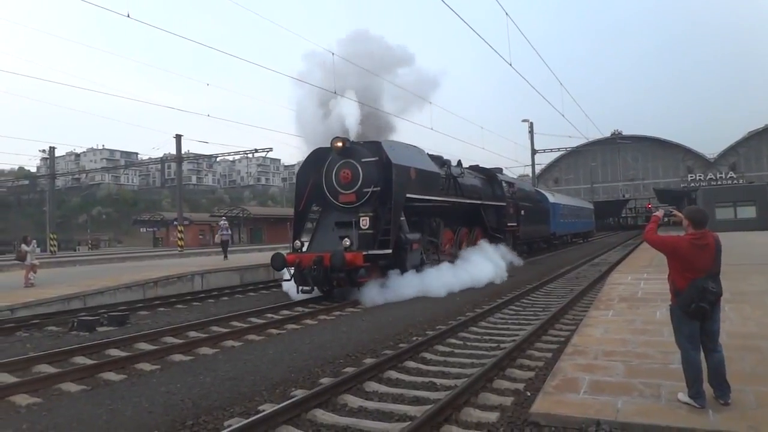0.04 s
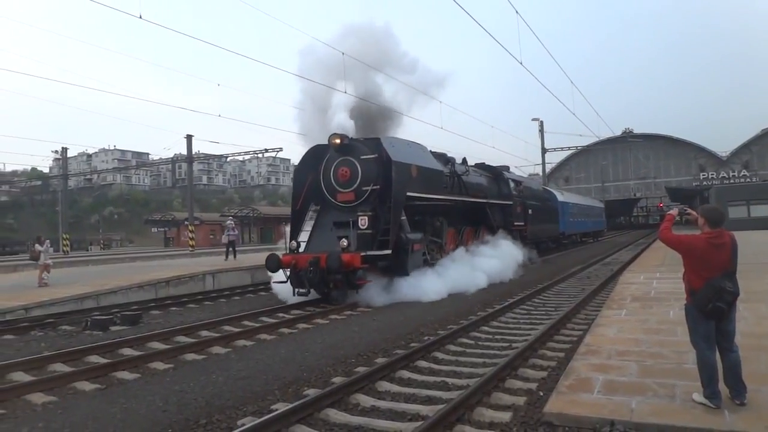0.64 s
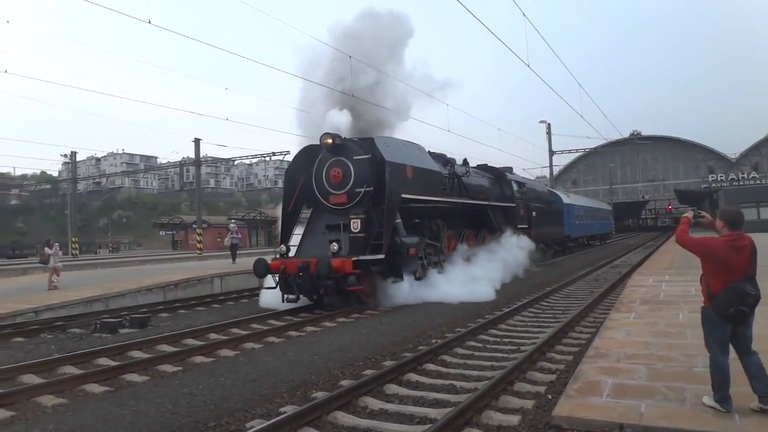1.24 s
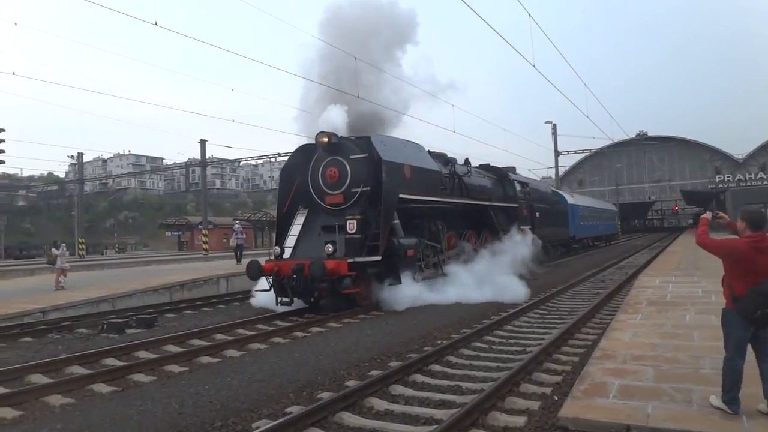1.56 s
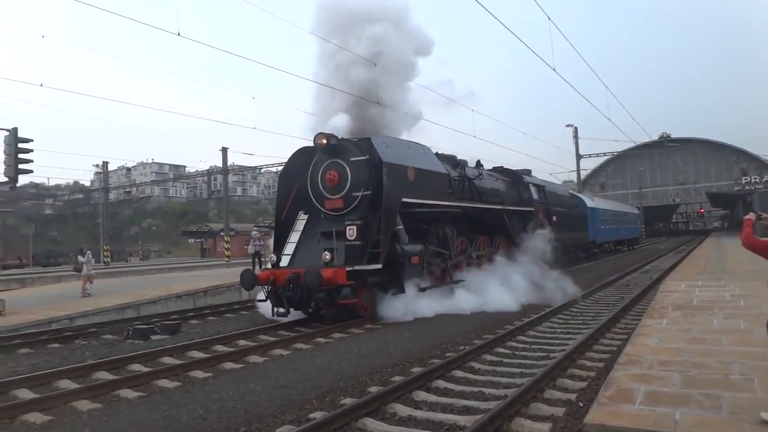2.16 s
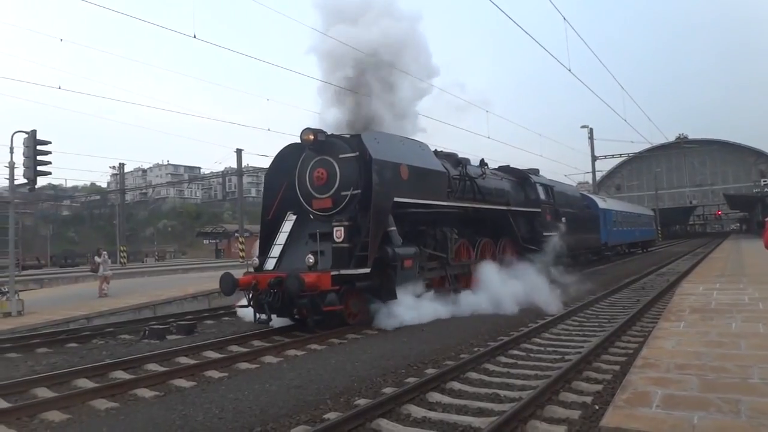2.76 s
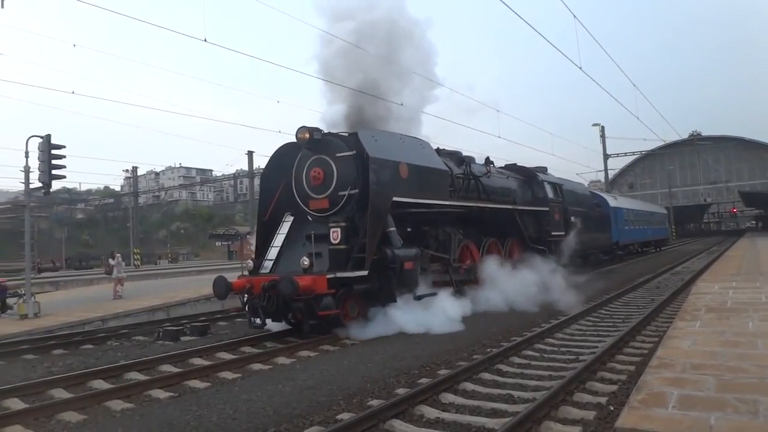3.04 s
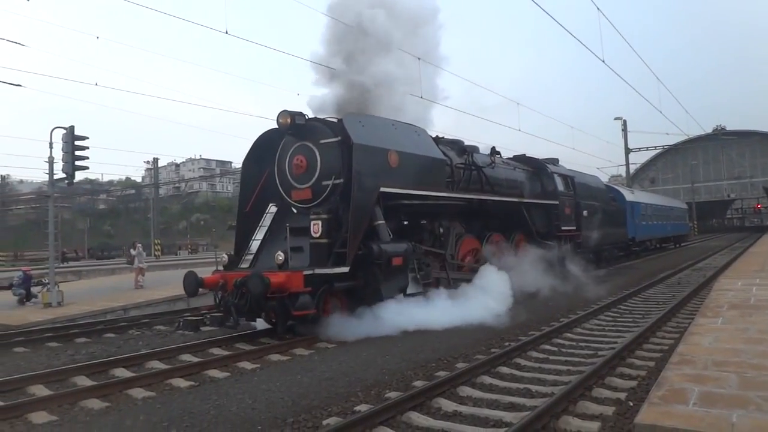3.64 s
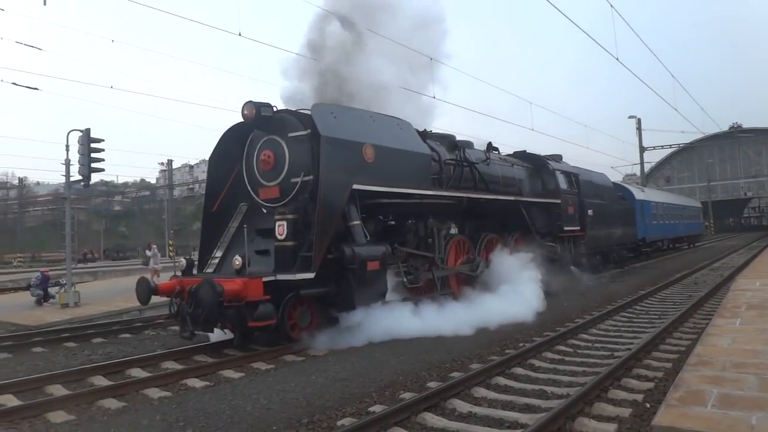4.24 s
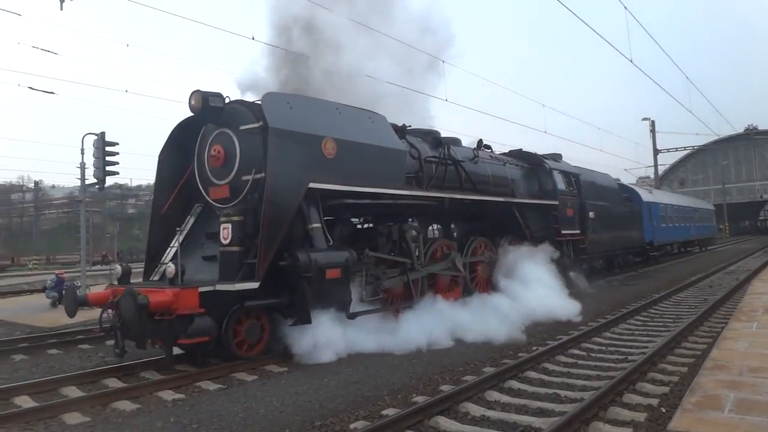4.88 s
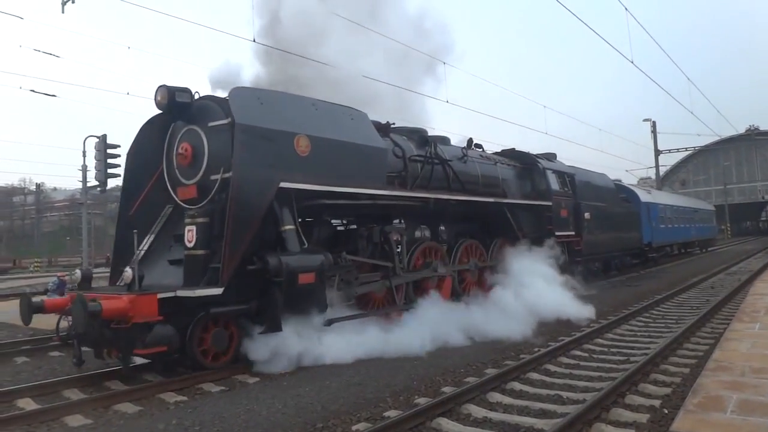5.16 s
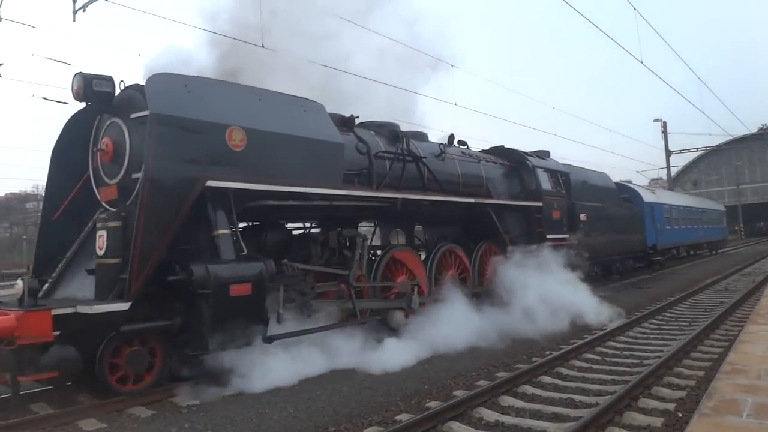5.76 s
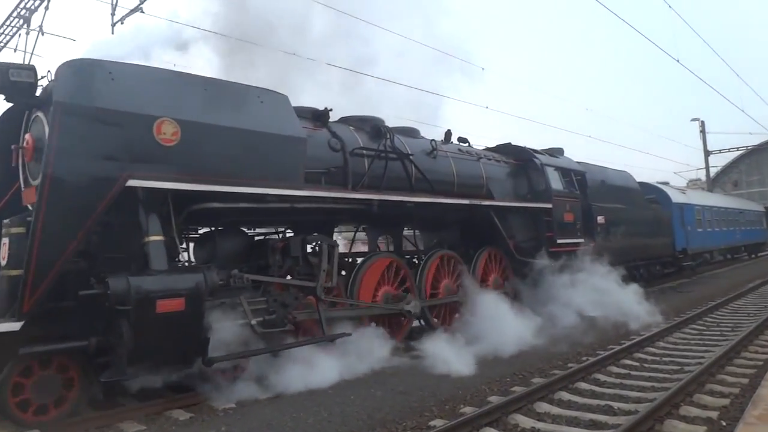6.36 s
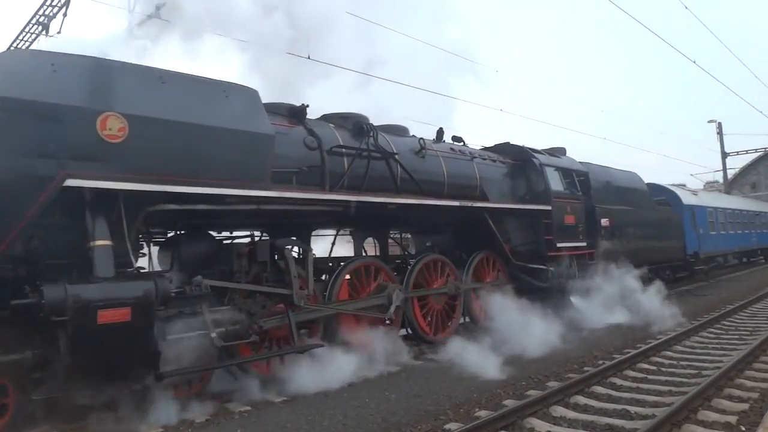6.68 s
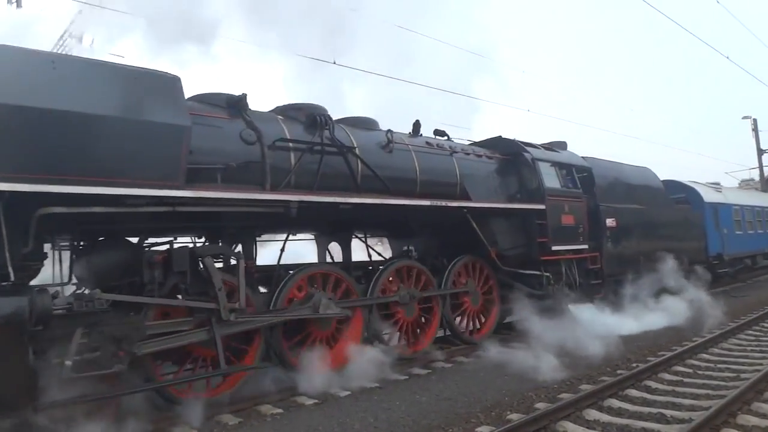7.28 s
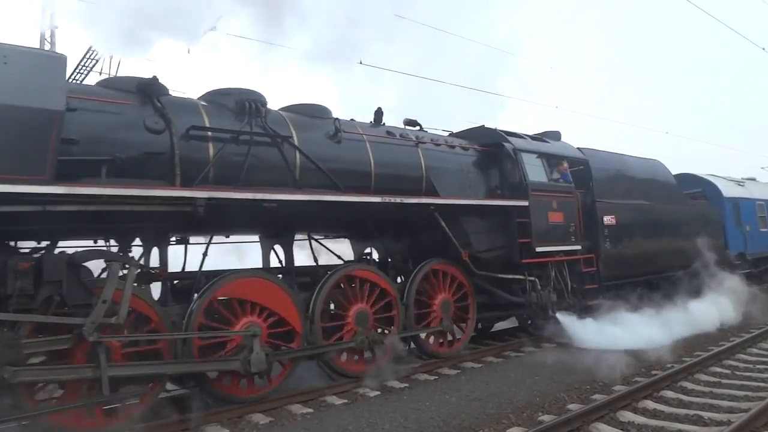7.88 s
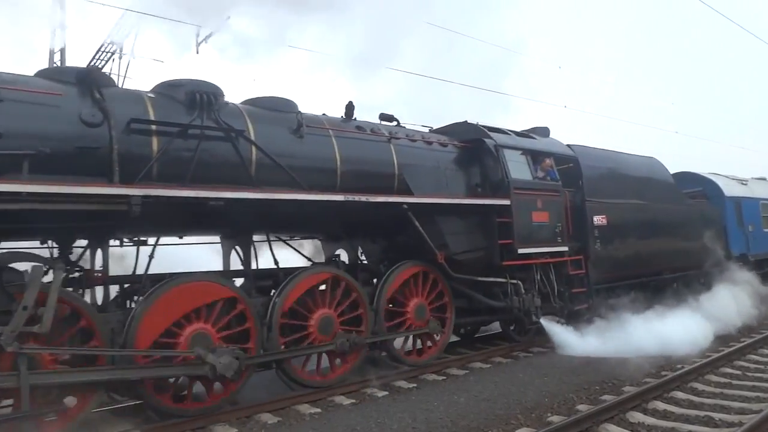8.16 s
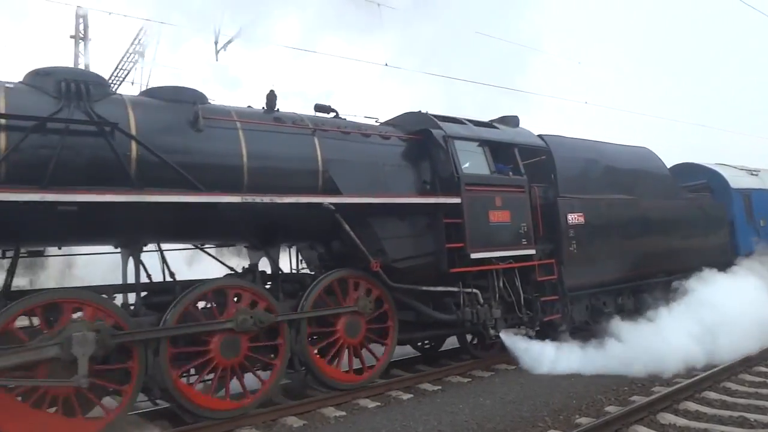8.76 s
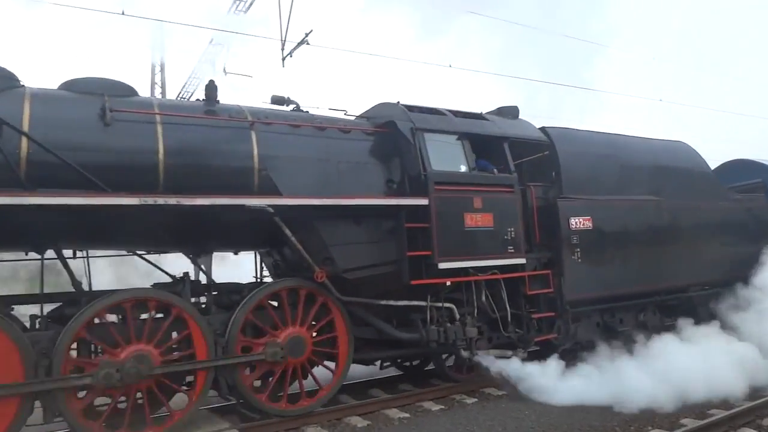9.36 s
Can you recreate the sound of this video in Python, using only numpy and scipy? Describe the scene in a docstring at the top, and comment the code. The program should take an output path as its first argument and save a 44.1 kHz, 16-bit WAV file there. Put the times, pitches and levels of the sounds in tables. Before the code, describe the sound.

A steam locomotive hisses loudly, cuts off the steam, then chuffs closer and louder with rumbling, lightly knocking running gear.

```python
"""Steam locomotive from the platform

The microphone stands 5 m from the track as an engine pulls out towards it. Straight ahead, open
cylinder cocks roar and hiss, then shut. The exhaust beats, faint at first, quicken and close in on
the left. Between them steam leaks and sings, the running gear rumbles and knocks, and a drain under
the cab sprays."""
import sys
import numpy as np
from scipy import signal
from scipy.fft import rfft, irfft, next_fast_len
from scipy.io import wavfile

SR = 44100
rng = np.random.default_rng(int(sys.argv[2]) if len(sys.argv) > 2 else 0)


def store_pcm(level_fs):
    """Save levels as 16-bit WAV."""
    pcm = np.round(np.clip(level_fs, -1, 1) * 32767).astype(np.int16)
    wavfile.write(sys.argv[1], SR, np.atleast_2d(pcm).T)


N = 424241
T = np.arange(N) / SR
CUTOFF_HZ = 11050

# the four voices of the cocks, heard head-on: f/Hz, relative density/dB
JET_HISS = [(2500, -24), (3900, -12), (4300, -6), (5100, -1.5), (6300, -0.5), (7600, -1), (9000, -2.5),
            (9800, -5), (10300, -1.5), (11500, -3.5)]
JET_RUSH = [(700, -46), (880, -18), (1150, -13), (1650, -9), (2100, -1.5), (2400, -1.5), (2800, 0),
            (3550, 1), (4000, -4), (5000, -42)]
JET_HOWL = [(1000, -26.5), (1190, -21), (1330, -3.5), (1480, -3.5), (1650, -8), (2100, -17), (2900, -15),
            (3450, -6.5), (4100, -10.5), (4600, -25)]
JET_ROAR = [(25, -25), (70, -17), (125, -16.5), (190, -9), (280, -3), (480, 0.5), (720, 2), (930, 9.5),
            (1200, 5.5), (2500, -18)]
# how alike the jets are on both sides of the microphone: f/Hz, correlation
JET_LIKENESS = [(60, .9), (150, .65), (280, 0.64), (550, 0.39), (1140, 0.74), (2400, 0.92), (4500, 0.93),
                (10000, 0.95)]
HISS_DB, RUSH_DB, HOWL_DB, ROAR_DB = -17.5, -25.5, -37.5, -51   # between strokes
TOP_DB, TOP_RISE_DB_PER_S = -1.3, 0.37   # the jets brighten as they come nearer
PIPE_ROUND_TRIP_S, SHUT_S = 0.0023, 5.563


def cylinder_cocks():
    """Wet steam jets down the track: hiss over a rush, howling drain pipes and a low roar."""
    hiss_db, top_db, rush_db, howl_db, roar_db = stroke_gains()
    jets = from_db(HISS_DB + hiss_db) * turbulence(JET_HISS, JET_LIKENESS, eddy_db=1.5) * gusts(.28, 42)
    jets = brighten(jets, TOP_DB + TOP_RISE_DB_PER_S * T + top_db, above_hz=9600)
    jets += from_db(RUSH_DB + rush_db) * turbulence(JET_RUSH, JET_LIKENESS, eddy_db=1.4) * gusts(.57, 22)
    howl = from_db(HOWL_DB + howl_db) * gusts(.48, 4)
    # the harder the pipes howl, the more their round trip colours the jet
    jets += np.clip(howl * from_db(10), 0, .2) * delayed(jets, PIPE_ROUND_TRIP_S)
    jets += howl * turbulence(JET_HOWL, JET_LIKENESS, eddy_db=2.2)
    # the low roar sputters, dipping briefly at random
    sputter = rms_one(from_db(-4 * np.maximum(drift(rate_hz=22), 0)))
    jets += from_db(ROAR_DB + roar_db) * turbulence(JET_ROAR, JET_LIKENESS, eddy_db=1.7) * sputter
    # the flow is cut quickly, then a faint tail dies away more slowly
    shut_s = np.clip(T - SHUT_S, 0, 1)
    return jets * np.maximum(from_db(-480 * shut_s), from_db(-11.5 - 180 * shut_s))


# piston strokes behind the near cocks:
# admission t/s, cut-off t/s, release t/s, hiss gain/dB, howl gain/dB, roar gain/dB
PISTON_STROKES = [(-.3, .2, 0.63, 3, 9, 3.5), (2.837, 3.92, 4.09, 3, 10, 14), (4.28, 4.957, 5.6, 1.5, 1, 9)]
ADMIT_S, RELEASE_S, RECOVER_S = .065, .08, .35
EXPANSION_DB_PER_S, CALM_S = 5, 0.33   # after cut-off the hiss sags, howl and roar die away


def stroke_gains():
    """Steam enters, expands and is released: dB added to hiss, top end, rush, howl and roar."""
    hiss, howl, roar, opening, slack, drive = np.zeros((6, N))
    for admitted, cut_off, released, hiss_db, howl_db, roar_db in PISTON_STROKES:
        is_open = np.clip((T - admitted) / ADMIT_S, 0, 1) * np.clip(1 - (T - released) / RELEASE_S, 0, 1)
        expanding_s = np.maximum(T - cut_off, 0)
        full_flow = is_open * np.exp(-expanding_s / CALM_S)
        opening += is_open
        slack += burst(released, RELEASE_S, RECOVER_S)
        drive += is_open * hiss_db
        hiss += is_open * (hiss_db - EXPANSION_DB_PER_S * expanding_s)
        howl += full_flow * howl_db
        roar += full_flow * roar_db
    top = .25 * hiss - 7.5 * slack * (1 - opening)   # each release leaves the jet slack and duller
    return hiss, top, 0.76 * drive, howl, roar


# beats nearing the microphone, four to a wheel turn: t/s, relative blast level/dB, relative boom level/dB
BEATS = [(.66, -31, -47.5), (1.72, -32.5, -52), (2.63, -32, -42.5), (3.32, -37, -46), (4.13, -31.5, -48),
         (4.77, -49, -50), (5.375, -34, -40.5), (5.951, -28.5, -32.5), (6.484, -25.5, -33),
         (7.002, -24.5, -29), (7.486, -20, -25.5), (7.99, -18, -24.5), (8.443, -17.5, -23),
         (8.893, -20, -20), (9.32, -19, -20)]
# the four cylinder ends, in turn: blast swell/s, boom swell/s, fall/s, relative hiss level/dB
CYLINDER_ENDS = [(0.088, 0.087, 0.061, -6), (0.088, 0.072, 0.043, -7.5), (0.079, 0.083, 0.046, -1),
                 (0.086, 0.073, 0.042, -11.5)]
# steam at the blast pipe, at the valve and up the chimney: f/Hz, relative density/dB
BLAST = [(150, -21), (500, -15.5), (800, -4.5), (1150, 2.5), (1700, -2), (2400, -2.5), (3000, -1),
         (4100, -7.5), (5500, -8.5), (8500, -10), (11500, -16)]
VALVE_HISS = [(600, -37), (1800, 3), (3200, -6.5), (4200, -6), (5600, 3), (7200, -2.5), (9000, 1),
              (11500, -6)]
DRAUGHT = [(60, -10), (130, -1), (185, -0.5), (700, 1.5), (1500, 5)]
# chimney resonances: f/Hz, width/Hz, relative level/dB
CHIMNEY_MODES = [(203, 36, -2), (255, 66, -4.5), (354, 50, -3.5), (415, 91, -4), (490, 54, 2),
                 (600, 81, -6.5), (810, 120, -9.5)]
# ground bounce at the microphone, later as the chimney comes near: t/s, lag/s
GROUND_LAG = [(6, .0047), (9.3, .0088)]
# how alike the engine is on both sides of the microphone: f/Hz, correlation
ENGINE_LIKENESS = [(60, 0.97), (280, 1), (550, 0.94), (2400, 0.94), (5000, 0.84), (10000, 0.89)]


def exhaust():
    """Each beat starts as a hiss at the valve, then swells into a blast that makes the chimney boom."""
    blast, boom, hiss = np.zeros((3, N))
    for k, (start, blast_db, boom_db) in enumerate(BEATS):
        swell_s, boom_swell_s, fall_s, hiss_db = CYLINDER_ENDS[k % len(CYLINDER_ENDS)]
        blast += from_db(blast_db - 1.86) * burst(start, swell_s, fall_s)
        boom += from_db(boom_db - 1.8) * burst(start, boom_swell_s, fall_s) ** 1.17
        hiss += from_db(blast_db + hiss_db) * burst(start, rise_s=0.026, fall_s=0.048)
    beats = blast * turbulence(BLAST, ENGINE_LIKENESS, eddy_db=1.5) * gusts(.4, 70)
    beats += hiss * turbulence(VALVE_HISS, ENGINE_LIKENESS, eddy_db=1.0)
    booms = boom * resonate(turbulence(DRAUGHT, ENGINE_LIKENESS, eddy_db=1.0), CHIMNEY_MODES)
    ground_bounce = .25 * delayed(booms, np.interp(T, *np.transpose(GROUND_LAG)))
    return near_paths(beats) + booms + ground_bounce


# gear, glands and cab drain, heard from the platform edge: f/Hz, relative density/dB
GEAR_RUMBLE = [(25, -26), (55, -5.5), (110, -3.5), (220, 2), (330, -1.5), (480, 0), (700, -1.5), (1000, 2),
               (1350, 1), (1680, 4.5), (2100, -3.5), (3000, -1.5), (4500, -10.5), (11500, -38)]
GLAND_LEAK = [(800, -37), (2200, -3), (3300, -4), (4100, -8), (5200, 1.5), (6000, 3.5), (6900, -5),
              (8200, 0.5), (9600, 0.5), (10400, -0.5), (11500, -4)]
DRAIN_SPRAY = [(1000, -25), (2200, -26), (5300, -8.5), (7000, -12), (8200, -6.5), (8750, -1), (9300, -7.5),
               (11500, -11)]
FAR_RUMBLE_DB, WHISTLE_DB = -60.5, -55


def rolling_engine():
    """The running gear rumbles, glands leak with one thin whistle, and the cab drain sprays."""
    gear_db = passing_db(abreast_m=21.2, level_db=-34, falloff=2.64)
    leak_db = passing_db(abreast_m=17.2, level_db=-40.5, falloff=1)
    drain_db = passing_db(abreast_m=21.34, level_db=-33.5, falloff=3.6)
    rumble_gain = np.hypot(from_db(gear_db), from_db(FAR_RUMBLE_DB))
    gear = rumble_gain * turbulence(GEAR_RUMBLE, ENGINE_LIKENESS, eddy_db=2.0) * gusts(.7, 30)
    steam = from_db(leak_db) * turbulence(GLAND_LEAK, ENGINE_LIKENESS, eddy_db=2.2)
    steam += from_db(drain_db) * turbulence(DRAIN_SPRAY, ENGINE_LIKENESS, eddy_db=-0.5)
    drain_note = from_db((drain_db + gear_db) / 2 - 6) * steam_note(hz=1606, width_hz=130)
    fade_db = np.interp(T, [7.4, 8.6], [0, -8])
    whistle = from_db(WHISTLE_DB + fade_db) * steam_note(hz=3569, width_hz=26)
    return gear + whistle + drain_note + near_paths(steam)


# rod knocks at close range: t/s, relative level/dB, strongest f/Hz
KNOCKS = [(6.07, -35, 1090), (6.136, -38, 1110), (6.665, -29, 1300), (6.69, -35, 500), (6.835, -29.5, 430),
          (8.6, -23, 1300), (8.636, -26, 1000), (8.739, -23.5, 553), (9.585, -30, 1750)]
# rod resonances: f/Hz, relative level/dB, t60/s
ROD_MODES = [(290, -5.5, .07), (424, -1, 0.085), (489, -1, .075), (763, -4, .08), (1106, 0, 0.1),
             (1480, -3, 0.11), (1750, -1, 0.058)]


def rod_knocks():
    """Play in the bearings: a short rattle rings the rods, each knock favouring some modes."""
    rattles = np.array([from_db(db - 27.5) * burst(s, rise_s=.0013, fall_s=.0087) for s, db, _ in KNOCKS])
    strongest_hz = np.array(KNOCKS)[:, 2]
    rods = np.zeros(N)
    for hz, db, t60 in ROD_MODES:
        shares = from_db(-12 * np.log2(hz / strongest_hz) ** 2)
        contacts = shares @ rattles * rng.standard_normal(N)
        rods += from_db(db) * ring(contacts, hz, t60)
    return rods


# a spit of steam from the engine: t/s, level/dB, fall/s
SPIT = (6.129, -26.5, 0.01)
# its hiss: f/Hz, relative density/dB
SPIT_HISS = [(1000, -20), (2800, 2), (4200, -4), (6300, 1), (9000, -5), (11500, -10)]


def spit():
    """One sharp spurt of steam."""
    start, db, fall_s = SPIT
    spurt = from_db(db) * burst(start, rise_s=0.0022, fall_s=fall_s)
    return spurt * turbulence(SPIT_HISS, ENGINE_LIKENESS, eddy_db=0)


QUARTER_TURN_M, TRACK_DISTANCE_M = 1.482, 5.04


def passing_db(abreast_m, level_db, falloff):
    """A part nears the microphone, gaining speed evenly, and reaches level_db after abreast_m."""
    beat_times = np.array(BEATS)[:, 0]
    beats_done = np.polyval(np.polyfit(beat_times, np.arange(len(BEATS)), 2), T)
    distance_m = np.hypot(TRACK_DISTANCE_M, abreast_m - QUARTER_TURN_M * beats_done)
    return level_db + falloff * 20 * np.log10(TRACK_DISTANCE_M / distance_m)


def to_the_left(x):
    """As the engine draws level the right side is shaded: not in the bass, most in the treble."""
    bearing = np.interp(T, [5.0, 7.0, 8.8], [.35, .72, 1])
    mid = x.mean(axis=0)
    above_bass = signal.sosfilt(signal.butter(1, 170, "high", fs=SR, output="sos"), mid)
    treble = signal.sosfilt(signal.butter(1, [3700, 5800], "band", fs=SR, output="sos"), mid)
    return x + (0.12 * bearing * above_bass + 0.18 * bearing ** 3 * treble) * [[1], [-1]]


# dips in the low roar: t/s, half width/s, gain/dB
ROAR_DIPS = [(.43, .018, -23), (.65, 0.013, -11), (1.655, 0.025, -30), (2.1, .016, -16), (2.54, 0.03, -30),
             (4.33, .03, -10), (5.04, .014, -11), (5.1, .022, -17), (5.372, .016, -23)]


def low_dips(x, below_hz):
    """The low end drops out for brief moments."""
    gain = from_db(sum(db / (1 + ((T - s) / half_s) ** 2) ** 1.9 for s, half_s, db in ROAR_DIPS))
    lows = signal.sosfiltfilt(signal.butter(6, below_hz, fs=SR, output="sos"), x)
    return x - (1 - gain) * lows


# paths to the microphone off ballast, boiler and platform: lag when far/s, lag when near/s, share
NEAR_PATHS = [(.0017, .0031, .17), (.0046, .0054, .17), (.0074, .0105, .17)]


def near_paths(x):
    """Close reflections comb the sound; their hollow colour slides as the engine moves."""
    return x + sum(share * delayed(x, np.interp(T, [5, T[-1]], [far_s, near_s]))
                   for far_s, near_s, share in NEAR_PATHS)


# echoes from farther off in the station: lag/s, level/dB, left over right/dB
STATION_ECHOES = [(.047, -11, -2), (.083, -28, 1), (.131, -35, 1.5), (.21, -35, -8)]


def station(x, dull_hz):
    """Platforms and buildings return a few dull echoes."""
    dull = signal.sosfilt(signal.butter(1, dull_hz, fs=SR, output="sos"), x)
    return x + sum(from_db(db) * pan(left_db) * delayed(dull, s) for s, db, left_db in STATION_ECHOES)


def turbulence(spectrum, likeness, eddy_db):
    """Stereo flow noise of rms 1 whose narrow bands swell and fade as eddies come and go."""
    size = next_fast_len(N, True)
    hz = np.arange(size // 2 + 1) * SR / size
    mid, side = rfft(rng.standard_normal((2, size)))
    alike = np.clip(at_hz(likeness, hz), 0, 1)
    white = np.sqrt(1 + alike) * mid + np.sqrt(1 - alike) * side * [[1], [-1]]
    low_skirt = 1 / (1 + (spectrum[0][0] / (hz + 1) / 2) ** 4)
    high_skirt = (hz < CUTOFF_HZ) / (1 + (hz / (1.5 * spectrum[-1][0])) ** 4)
    flow = white * from_db(at_hz(spectrum, hz)) * low_skirt * high_skirt
    band = np.sqrt(hz).astype(int)   # bands widen with pitch
    angle = rng.uniform(0, 2 * np.pi, band[-1] + 1)[band]
    # two slow motions, which every band follows in a mix of its own
    steady, first, second = (irfft(flow * mix, size)[:, :N] for mix in (1, np.cos(angle), np.sin(angle)))
    eddies = first * drift(rate_hz=6) + second * drift(rate_hz=6)
    return rms_one(steady + (from_db(eddy_db) - 1) * eddies)


def burst(start, rise_s, fall_s):
    """A straight rise, then an exponential fall, like pressure let out by a valve."""
    age = T - start
    return np.clip(age / rise_s, 0, 1) * np.exp(-np.clip((age - rise_s) / fall_s, 0, 20))


def steam_note(hz, width_hz):
    """Noise sings through one narrow resonance."""
    return resonate(rng.standard_normal(N), [(hz, width_hz, 0)])


def resonate(x, modes):
    """Parallel resonances of alternating sign; rms 1."""
    return rms_one(sum((-1) ** k * from_db(db) * width * ring(x, hz, t60=np.log(1000) / np.pi / width)
                       for k, (hz, width, db) in enumerate(modes)))


def ring(drive, hz, t60):
    """One damped mode: each click sets a sine ringing."""
    r, w = from_db(-60 / (t60 * SR)), 2 * np.pi * hz / SR
    return signal.lfilter([0, np.sin(w)], [1, -2 * r * np.cos(w), r * r], drive + 1e-18)


def gusts(depth_db, rate_hz):
    """The whole stream swells and sags at random."""
    return from_db(depth_db * drift(rate_hz))


def drift(rate_hz):
    """A smooth random wander of spread 1."""
    hop, settle = 40, 2000
    r = np.exp(-2 * np.pi * rate_hz * hop / SR)
    slow = signal.lfilter([1], [1, -2 * r, r * r], rng.standard_normal(N // hop + settle + 2))[settle:]
    return np.interp(np.arange(N) / hop, np.arange(len(slow)), rms_one(slow))


def brighten(x, treble_db, above_hz):
    """A moving treble shelf."""
    top = signal.sosfiltfilt(signal.butter(2, above_hz, "high", fs=SR, output="sos"), x)
    return x + (from_db(treble_db) - 1) * top


def delayed(x, lag_s):
    """Stereo sound arriving later by a steady or moving delay."""
    return np.array([np.interp(T - lag_s, T, side, left=0) for side in x])


def pan(left_db):
    """Left and right gains for a level difference."""
    return from_db(np.array([[.5], [-.5]]) * left_db)


def at_hz(points, hz):
    """Read a curve on a log-frequency axis."""
    known_hz, values = np.transpose(points)
    return np.interp(np.log(hz + 1), np.log(known_hz), values)


def from_db(db):
    return 10 ** (np.asarray(db) / 20)


def rms_one(x):
    return x / np.sqrt(np.mean(x ** 2) + 1e-20)


def scene():
    """The cocks blow straight at the microphone; the rest of the engine slides to the left."""
    engine = station(exhaust() + spit() + rod_knocks(), dull_hz=2490) + rolling_engine()
    return low_dips(cylinder_cocks() + to_the_left(engine), below_hz=900)


def record(dry):
    """After the microphone, the highest peaks are clipped and the top is cut steeply."""
    top_cut = signal.ellip(10, .05, 60, CUTOFF_HZ, fs=SR, output="sos")
    return signal.sosfiltfilt(top_cut, np.clip(dry, -.8, .8))


dry = scene()
out = record(dry)
store_pcm(out)
```